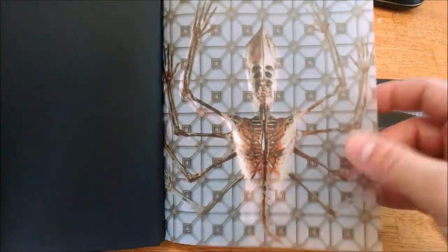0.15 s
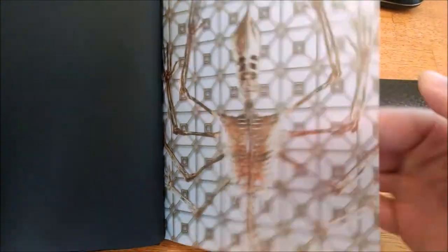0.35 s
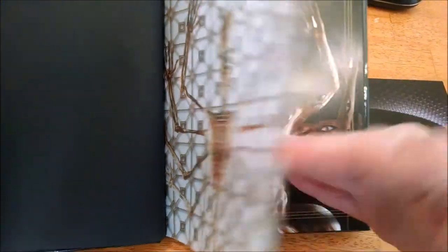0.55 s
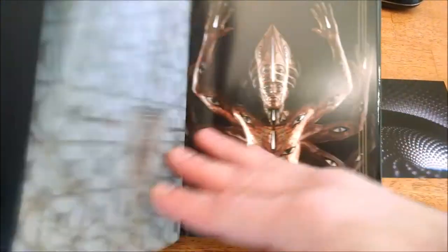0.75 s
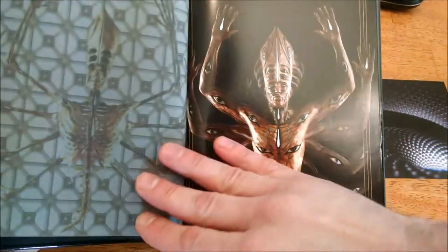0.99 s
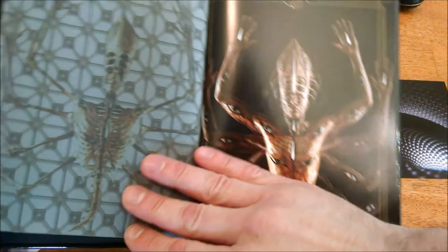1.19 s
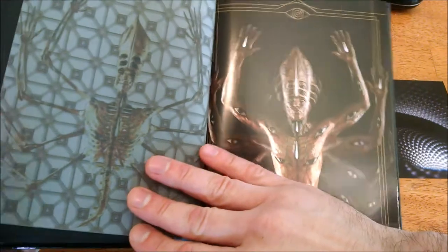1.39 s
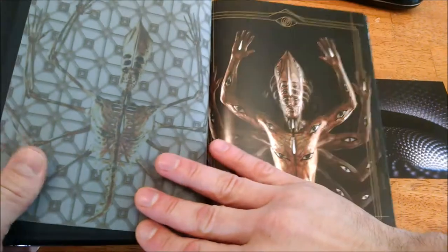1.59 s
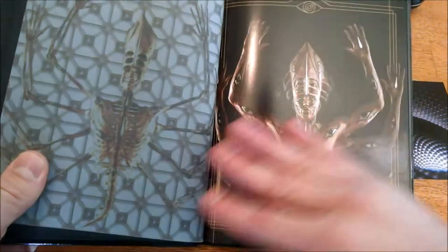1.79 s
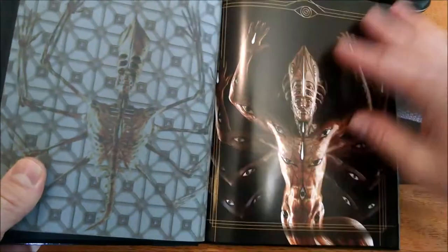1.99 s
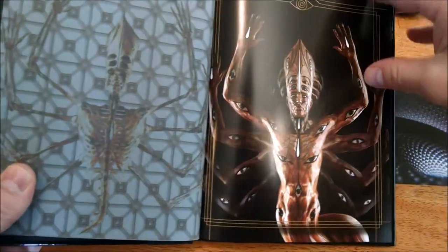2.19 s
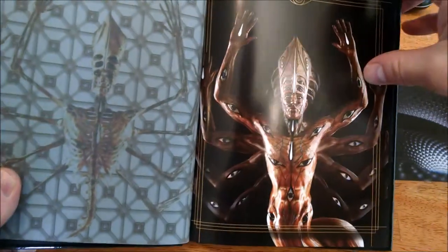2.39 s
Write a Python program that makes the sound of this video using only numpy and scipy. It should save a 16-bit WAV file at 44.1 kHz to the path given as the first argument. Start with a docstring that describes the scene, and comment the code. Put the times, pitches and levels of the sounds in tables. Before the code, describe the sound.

Plastic page rustles and crackles as it is turned, the spine snaps, fingertips tap, palm slides off

```python
"""A close hiss of skin and plastic comes first, over soft room tone: fine grains in a body and a treble part.
A hand turns a clear sheet in a stiff booklet on a wooden table: slips ring a hollow crackling band, short pops ring,
bright ticks and table thumps join in, and the stiff spine snaps once through its ringing modes.
Fingertips tap the booklet's modes, then the palm slides off the glossy page with a band of hiss.
A handheld recorder with two ports widens the picture by feeding each port, late and inverted, to the other side."""
import sys
import numpy as np
from scipy import signal
from scipy.fft import rfft, irfft
from scipy.io import wavfile

SR = 44100
rng = np.random.default_rng(int(sys.argv[2]) if len(sys.argv) > 2 else 0)


def natural_amplitude(level_db):
    """Convert a level in decibels to a linear amplitude factor, elementwise."""
    exponent = np.asarray(level_db, float) / 20
    return 10 ** exponent


def generate_wav(signal):
    """Clip the signal to [-1, 1] and save it as 16-bit WAV at the path in sys.argv[1]."""
    frames = np.transpose(np.atleast_2d(signal))
    scaled = np.clip(frames, -1, 1) * 32767
    pcm = np.round(scaled).astype(np.int16)
    wavfile.write(sys.argv[1], SR, pcm)


N = 108045  # length in samples


def rms_one(x):
    """Scale to unit rms."""
    return x / np.sqrt(np.mean(x ** 2) + 1e-20)


def in_time(spans):
    """Join the spans of a curve table and draw each column sample by sample."""
    time_s, *columns = np.transpose(np.concatenate(spans))
    return [np.interp(np.arange(N) / SR, time_s, column) for column in columns]


def drift(rate_hz):
    """Slow random wander of rms 1: noise through two equal one-pole lowpasses."""
    pole = np.exp(-2 * np.pi * rate_hz / SR)
    wander = signal.lfilter([1], [1, -2 * pole, pole * pole], rng.standard_normal(N + SR))
    return rms_one(wander[SR:])  # the first second only settles the filter


def grains(per_s, spread_db):
    """Random clicks of uneven size and sign, at the same instants in both ports but with separate signs."""
    sizes = natural_amplitude(spread_db * np.minimum(rng.exponential(1, N), 5))
    return (rng.random(N) < per_s / SR) * sizes * rng.choice([-1, 1], (2, N)) + 1e-18


def ring(clicks, hz, t60_s):
    """A two-pole resonator: a unit click sets a dying sine of height 1 ringing."""
    radius = natural_amplitude(-60 / (t60_s * SR))
    angle = 2 * np.pi * hz / SR
    return signal.lfilter([0, np.sin(angle)], [1, -2 * radius * np.cos(angle), radius * radius], clicks + 1e-18)


def swell(clicks, hz, cycles, rise_cycles):
    """Two resonators in a row make a ring that needs a few cycles to build up."""
    built = ring(ring(clicks, hz, cycles / hz), hz, rise_cycles / hz)
    return built * 29.0 * hz / SR / rise_cycles


def cut(x, hz, kind):
    """Second-order Butterworth filter."""
    return signal.sosfilt(signal.butter(2, hz, kind, fs=SR, output="sos"), x)


def colour(x, spectrum):
    """Shape x by a spectrum table, read along log frequency; rms 1."""
    hz, db = np.transpose(spectrum)
    log_hz = np.log(np.arange(N // 2 + 1) * SR / N + 1)
    return rms_one(irfft(rfft(x) * natural_amplitude(np.interp(log_hz, np.log(hz), db)), N))


def click(s, db):
    """One single-sample click at time s."""
    out = np.zeros(N)
    out[int(s * SR)] = natural_amplitude(db)
    return out


def burst(s, db, length_s, noise, rise_s=1e-5):
    """Noise that rises exponentially up to s, then decays at once; both times are to 1/e."""
    t = np.arange(N) / SR - s
    envelope = np.exp(-np.clip(t, 0, 1) / length_s + np.clip(t, -1, 0) / rise_s)
    return natural_amplitude(db) * envelope * noise


def bright_part(white):
    """White noise held to a bright band for ticks, snap and taps; rms 1."""
    return rms_one(cut(white, (1800, 11200), "band"))


def late(x, s):
    """Delay by s seconds, fractions of a sample included; negative is earlier."""
    return irfft(rfft(x) * np.exp(-2j * np.pi * np.arange(N // 2 + 1) * SR / N * s), N)


PORT_LEAD_S = 0.00007  # the left port hears first


def ports(pair):
    """A wide source: in the middle range the left port hears part of what the right hears, a little earlier."""
    alike = 0.74
    swap = alike * late(pair[1], -PORT_LEAD_S) - (1 - np.sqrt(1 - alike ** 2)) * pair[0]
    return np.array([pair[0] + cut(swap, (185, 7500), "band"), pair[1]])


# skin and sheet sliding: time_s, level_db, treble_db (added to the treble part alone)
SLIDE_MOVES = [
    [(0.0, -42.5, 0), (0.098, -65, -5), (0.102, -62, -23), (0.236, -37.5, -6)],
    [(0.3, -35.5, -1.5), (0.42, -34.5, -3), (0.472, -36, -9), (0.508, -40.5, -8), (0.576, -42.5, 1.5),
     (0.722, -36.5, -7)],
    [(0.75, -41.5, -1), (0.834, -33.5, 0.5), (0.932, -39, 5), (0.97, -42.5, 3), (1.08, -48.5, 6)],
    [(1.115, -56, -5), (1.147, -49.5, 1.5), (1.255, -41, 6), (1.363, -46.5, 2.5), (1.385, -61, -4)],
    [(1.397, -48.5, 4.5), (1.473, -45, 4), (1.541, -50.5, 0.5), (1.665, -71.5, 5)],
    [(1.695, -64, -34), (1.751, -50, 10), (1.847, -43, 5.5), (1.863, -34.5, 0.5)],
    [(1.9, -33.5, 1), (1.982, -33.5, 0), (2.0, -32.5, 4), (2.05, -30.5, -9), (2.11, -35.5, -7),
     (2.128, -32, -13), (2.17, -39.5, -9)],
    [(2.25, -42.5, -24), (2.278, -36, -7), (2.312, -49.5, -11), (2.346, -67, -10), (2.45, -85, -4)],
]
# spectra of the two parts of the slide: pitch_hz, density_db (per Hz, relative)
SLIDE_BODY_SPECTRUM = [(300, -10), (900, -26), (2000, -1.5), (3800, -1), (5200, -3), (6800, -2.5),
                       (8500, -17.5), (11000, -14)]
SLIDE_TREBLE_SPECTRUM = [(6000, -9.5), (8500, 3.5), (11000, 4.5), (12500, 6), (14000, 7.5), (16000, -21)]


def slide():
    """Friction as dense fine grains, in a body and a treble part, each flickering a little."""
    grains_per_s, grain_spread_db, patchy_db = 7000, -0.5, 2
    level_db, treble_db = in_time(SLIDE_MOVES)
    shared = drift(10.3)
    body = colour(grains(grains_per_s, grain_spread_db), SLIDE_BODY_SPECTRUM)
    body = body * natural_amplitude(patchy_db * (shared + drift(36)))
    treble = colour(grains(grains_per_s, grain_spread_db), SLIDE_TREBLE_SPECTRUM)
    treble = treble * natural_amplitude(treble_db + patchy_db * (shared + drift(35)))
    return natural_amplitude(level_db) * (body + treble)


# steady background of the room: pitch_hz, density_db (per Hz, relative)
ROOM_SPECTRUM = [(25, 13), (60, 1.5), (120, 10), (500, 0), (1200, -14), (2000, -13), (4000, -7),
                 (5000, -11), (9000, -12), (16000, -8)]


def room_tone():
    """Steady noise in the colour of the room, spread wide over the ports."""
    return natural_amplitude(-49.5) * ports(colour(rng.standard_normal((2, N)), ROOM_SPECTRUM))


# handling rumble: time_s, level_db
RUMBLE_LEVEL = [
    [(0.0, -81), (0.12, -72), (0.4, -69), (0.5, -45), (0.68, -52.5), (0.85, -55), (1.0, -57), (1.25, -72),
     (1.48, -64)],
    [(1.62, -56), (1.8, -53), (1.9, -71), (2.45, -55)],
]


def rumble():
    """Lumpy low noise from hand and table, its own at each port."""
    lowpass_hz, lumps_db = 168, 2
    level_db, = in_time(RUMBLE_LEVEL)
    low = cut(rng.standard_normal((2, N)), lowpass_hz, "low")
    return natural_amplitude(level_db) * rms_one(low * natural_amplitude(lumps_db * drift(24)))


# the sheet bends: time_s, level_db, centre_hz (hollow band), flap_db (relative to the crackle),
# width_octaves (spread of the band, held to 0.1 or more)
BEND_MOVES = [
    [(0.08, -58.5, 1850, 0.5, 0.2), (0.298, -37, 1805, -33, 0.15), (0.328, -39.5, 1680, -29, 0.32),
     (0.36, -31.5, 1590, -20, 0.53)],
    [(0.4, -28.5, 1450, -19, 0.5), (0.42, -23.5, 1530, -34, 0.6), (0.45, -27.5, 1590, -30, 0.68),
     (0.474, -32.5, 1500, -24, 0.34), (0.484, -22.5, 1480, -13, 0.31), (0.51, -20.5, 1530, -15, 0.85),
     (0.54, -25.5, 1460, -14.5, 0.61)],
    [(0.55, -31.5, 1310, -13, 0.32), (0.578, -30, 1240, -10.5, 0.72), (0.63, -38, 1440, -5, 1),
     (0.694, -47.5, 1800, 3.5, 0.25), (0.746, -49.5, 1410, 6.5, 0.37)],
    [(0.78, -51, 1550, -7, 0.9), (0.832, -36.5, 1060, -1.5, 0.78), (0.97, -43, 1400, 0.5, 1),
     (0.978, -29, 1450, -17.5, 0.3), (1.08, -50.5, 1430, 4, 1)],
    [(1.115, -51, 1260, -17, 1), (1.477, -59.5, 1330, 9, 0.09), (1.49, -79, 1280, 18, 0.41)],
    [(1.53, -51, 1020, -3, 0.79), (1.592, -55, 1370, -5, 0.59), (1.66, -60, 1370, 5, 1)],
    [(1.72, -51.5, 1550, -24, 0.42), (2.12, -49.5, 1900, -2.5, 0.4), (2.45, -54, 1220, -5.5, 0.47)],
]


def bend():
    """Clumped slips ring short modes of the sheet around a moving centre; the flap moves air below."""
    slips_per_s, slip_spread_db, clump_db, clumps_hz = 6000, 2.4, 1.4, 50
    ring_cycles, flap_band_hz = 9.9, (182, 640)
    level_db, centre_hz, flap_db, width = in_time(BEND_MOVES)
    width = np.clip(width, .1, 2)
    slips = grains(slips_per_s, slip_spread_db) * natural_amplitude(clump_db * drift(clumps_hz))
    modes_hz = np.geomspace(500, 3000, 14)
    dealt = rng.integers(0, 14, N)  # which mode a slip excites
    rings = 0
    for k, hz in enumerate(modes_hz):
        nearness = np.exp(-.5 * (np.log2(hz / centre_hz) / width) ** 2)
        rings = rings + ring(slips * (dealt == k) * hz / centre_hz * nearness, hz, ring_cycles / hz)
    # keep the low skirts of the rings out of the bass
    rings = cut(rings, 464, "high") / np.sqrt(width)
    air = rng.standard_normal((2, N)) * natural_amplitude(clump_db * drift(clumps_hz))
    flap = rms_one(cut(air, flap_band_hz, "band"))
    return natural_amplitude(level_db) * (rms_one(rings) + natural_amplitude(flap_db) * flap)


# short ringing pops, creases in the sheet and a weak tap bounce at 1.706 s:
# start_s, level_db (near the peak), pitch_hz
SHORT_POPS = [(0.294, -27.5, 1760), (0.361, -27, 1490), (0.374, -25, 1490), (0.41, -24.5, 1440),
              (0.422, -22.5, 1560), (0.4793, -21.5, 1590), (0.491, -17, 2030), (0.514, -24, 1480),
              (0.528, -24, 1430), (0.586, -32, 1490), (0.678, -30, 1780), (0.891, -33, 1720),
              (0.982, -28, 1620), (1.005, -24, 1584), (1.08, -34, 1390), (1.1, -34, 1330),
              (1.706, -39.5, 1400)]


def pops():
    """Each crease, and the one tap bounce, swells and rings for a few cycles at its own pitch."""
    return sum(swell(click(s, db), hz, 30, 11.6) for s, db, hz in SHORT_POPS)


# the plastic unsticks or a nail touches: peak_s, level_db (of the centred band), length_s (decay to 1/e), centre_hz
BRIGHT_TICKS = [(.3255, -28, .004, 13500), (.3295, -25, .0025, 13500), (.3755, -20, .0025, 8000),
                (.4625, -29, .001, 7000), (.4797, -19, .0012, 6200), (.4915, -28, .002, 12500),
                (.517, -26, .0012, 6500), (.5275, -22, .0012, 9000), (1.1245, -33, .001, 4000),
                (1.5013, -23, .0009, 5500), (1.594, -44, .002, 9000), (2.238, -36, .001, 3500)]


def ticks(white):
    """Tiny bursts of bright noise, each weighted around a centre of its own."""
    half_width_octaves, broad_db = .35, -5
    bright = bright_part(white)
    out = 0
    for s, db, length_s, hz in BRIGHT_TICKS:
        edges_hz = (hz * 2 ** -half_width_octaves, hz * 2 ** half_width_octaves)
        band = rms_one(cut(white, edges_hz, "band"))
        out = out + burst(s, db, length_s, band + natural_amplitude(broad_db) * bright)
    return out


# the table thumps under the hand: start_s, level_db, pitch_hz, ring_cycles
TABLE_THUMPS = [(0.392, -37.5, 107, 4.7), (.485, -34.5, 133, 5.8), (1.499, -27.5, 185, 4.1),
                (1.538, -35, 145, 3.3), (1.682, -36.5, 113.5, 26), (1.775, -33.5, 130, 4.6)]


def thumps():
    """The wooden table answers with low rings that build up over a few cycles."""
    rise_cycles = 6.8
    return sum(swell(click(s, db), hz, cycles, rise_cycles) for s, db, hz, cycles in TABLE_THUMPS)


# resonances of the snapping spine: pitch_hz, level_db (relative to the snap), t60_s
SPINE_MODES = [(2220, -13, 0.012), (3070, 6, 0.0052), (3400, -6, 0.0079), (5720, -4, 0.008),
               (6900, -20, 0.0023), (8930, 3, 0.0042), (11640, -7, 0.0026), (13800, -23, .003)]


def snap(white):
    """The spine snaps once: a click rings its stiff modes under a very short noise crack."""
    start_s, level_db, crack_db, crack_s, thin_hz = 1.0937, -10, -16, 0.0019, 435
    modes = sum(ring(click(start_s, level_db + db), hz, t60_s) for hz, db, t60_s in SPINE_MODES)
    return cut(modes, thin_hz, "high") + burst(start_s, crack_db, crack_s, bright_part(white))


# fingertips on the booklet: start_s, level_db, softness_hz (lowpass of the contact), edge_db (bright noise)
FINGERTIPS = [(1.4997, -20.5, 810, -47), (1.545, -30.5, 604, -37.5), (1.6766, -21.5, 2290, -26.5)]
# resonances of the booklet: pitch_hz, level_db (relative to the tap), t60_s
BOOKLET_MODES = [(371, -15, 0.11), (716, -13.5, 0.074), (842, -3, 0.026), (920, -11, 0.057),
                 (1410, 2, 0.014), (1900, 3, 0.0083), (3230, -18, 0.031), (4350, -26, .01)]


def taps():
    """A graze, then a soft contact rings the booklet's modes with new strengths each time."""
    graze_lead_s, graze_db = 0.001933, -11  # the graze has the opposite sign
    edge_decay_s, edge_rise_s = 0.0055, 0.0014
    chance_db = rng.normal(0, 1.5, (len(FINGERTIPS), len(BOOKLET_MODES)))
    bright = bright_part(rng.standard_normal(N))
    out = 0
    for (s, level_db, soft_hz, edge_db), row in zip(FINGERTIPS, chance_db):
        touch = click(s, graze_db) - click(s + graze_lead_s, 0)
        touch = cut(cut(touch, soft_hz, "low"), soft_hz, "low")
        for (hz, mode_db, t60_s), extra_db in zip(BOOKLET_MODES, row):
            out = out + ring(touch, hz, t60_s) * natural_amplitude(level_db + mode_db + extra_db)
        out = out + burst(s, edge_db, edge_decay_s, bright, edge_rise_s)
    return cut(out, 333, "high")  # keep the low skirts of the booklet rings out of the bass


# the cupped palm leaves the page, the gap colours the hiss: time_s, level_db, pitch_hz, top_db (top hiss)
PALM_MOVES = [
    [(1.845, -58, 6000, -50), (1.862, -29, 6160, -23), (1.92, -37, 6100, -24.5), (2.05, -37, 6960, -23),
     (2.09, -38, 7550, -37), (2.3, -50.5, 7700, -64), (2.34, -66, 7500, -80)],
]


def palm():
    """Hiss in a band that climbs for most of the way as the gap opens, and a thin hiss at the very top."""
    width_hz, top_hz = 1000, 13000
    level_db, centre_hz, top_db = in_time(PALM_MOVES)
    noise = rng.standard_normal((2, 2, N))
    on = np.arange(N) / SR > PALM_MOVES[0][0][0]
    gap = 0
    for k, hz in enumerate(range(4500, 9500, 500)):
        band = rms_one(cut(noise[k % 2], (hz - 250, hz + 250), "band"))
        gap = gap + band * np.exp(-.5 * ((hz - centre_hz) / width_hz) ** 2)
    top = rms_one(cut(noise[0], top_hz, "high"))
    return on * (natural_amplitude(level_db) * rms_one(gap) + natural_amplitude(top_db) * top)


def room(x):
    """Reflections as a short dying tail of noise, different at each port."""
    t60_s, level_db = .1, -19
    t = np.arange(SR // 4) / SR
    tail = rng.standard_normal((2, len(t))) * natural_amplitude(-60 * t / t60_s) * (t > .002)
    tail = tail / np.sqrt(np.sum(tail ** 2, axis=1, keepdims=True))
    return natural_amplitude(level_db) * signal.fftconvolve(x, tail, axes=1)[:, :N]


def scene():
    """Wide rubbing and point-like hits with their room tail, over room tone and rumble."""
    white = rng.standard_normal(N)
    hits = pops() + ticks(white) + thumps() + snap(white) + taps()
    rubbing = ports(slide() + bend() + palm())
    near = rubbing + np.array([late(hits, -PORT_LEAD_S), hits])
    background = room_tone()
    return near + room(near) + background + rumble()


def low_pass(x):
    """Removes everything above the highest recorded frequency."""
    return signal.sosfilt(signal.butter(12, 16480, fs=SR, output="sos"), x)


def record(dry):
    """Each side takes the other port late and inverted; peaks are rounded and the top is cut."""
    cross_s = 17 / 44100
    bass_hz, bass_loss = 570, 0.34  # less is fed across in the bass
    across = late(dry - bass_loss * cut(dry, bass_hz, "low"), cross_s)
    left = 0.73 * dry[0] - 0.5 * across[1]
    right = dry[1] - 0.13 * across[0]
    rounded = np.tanh(np.array([left, right]))
    top_cut = signal.ellip(10, .5, 55, 15620, fs=SR, output="sos")
    mix = signal.sosfilt(top_cut, rounded)
    return low_pass(mix)


dry = scene()
out = record(dry)
generate_wav(out)
```